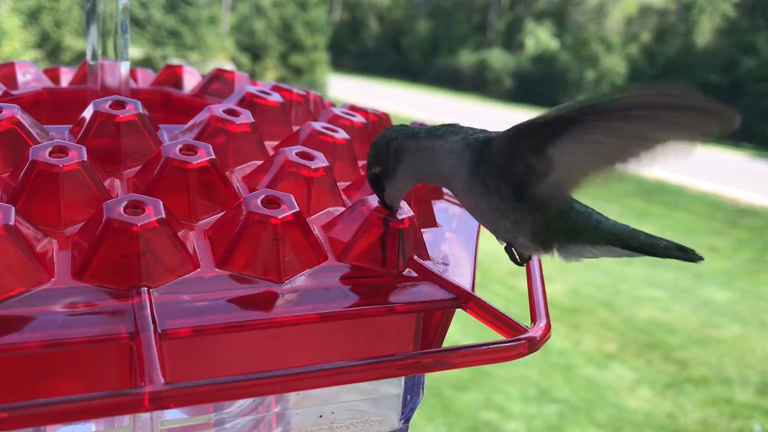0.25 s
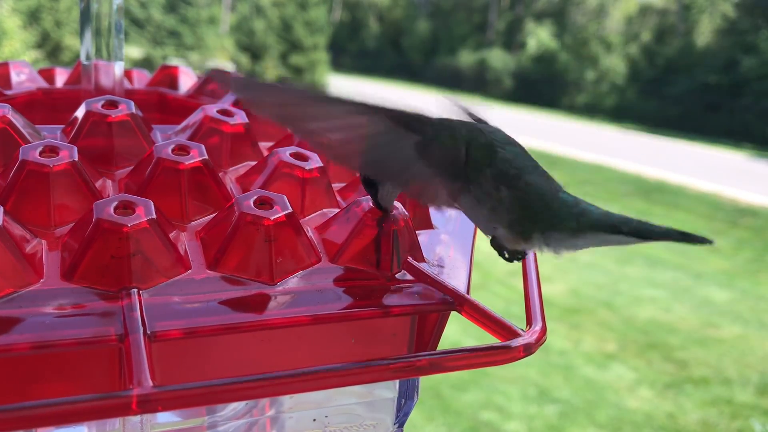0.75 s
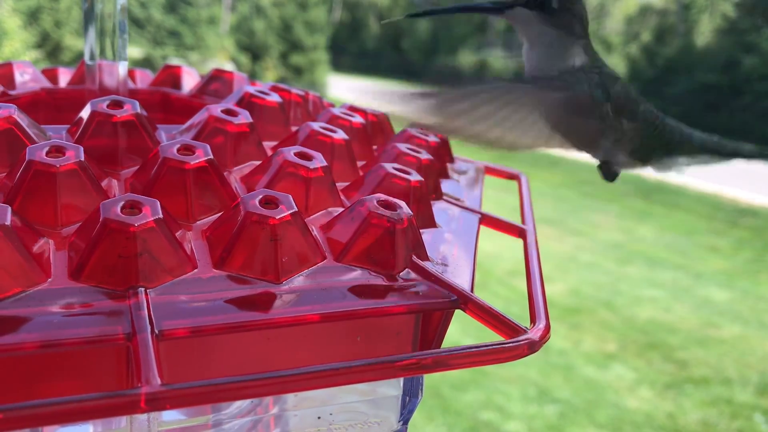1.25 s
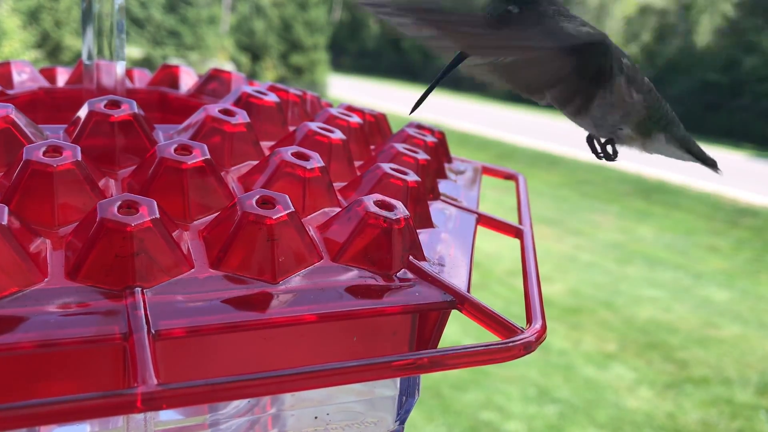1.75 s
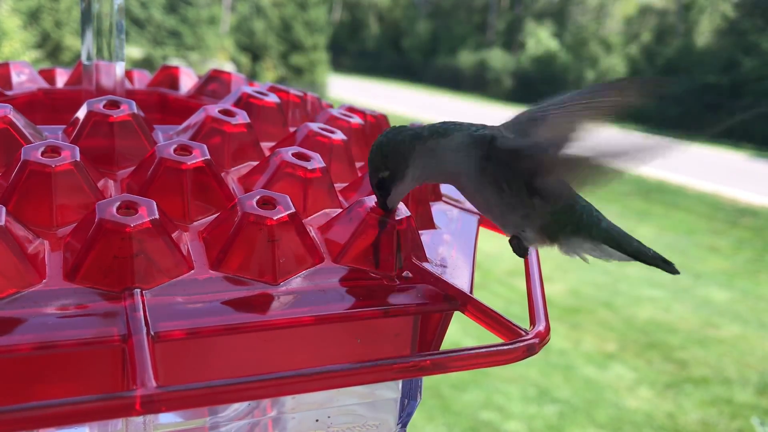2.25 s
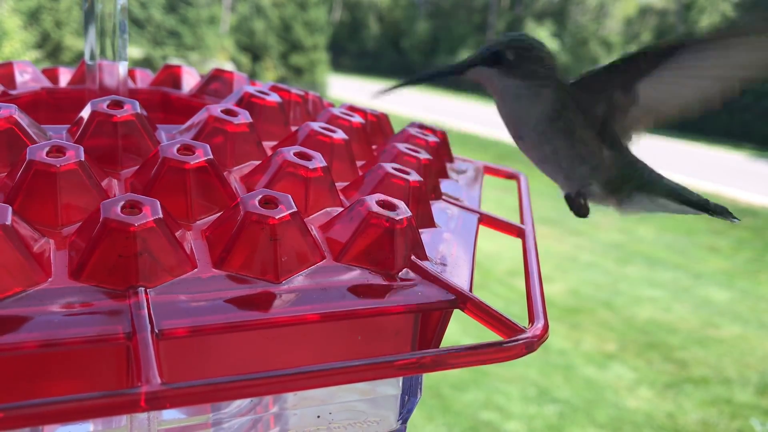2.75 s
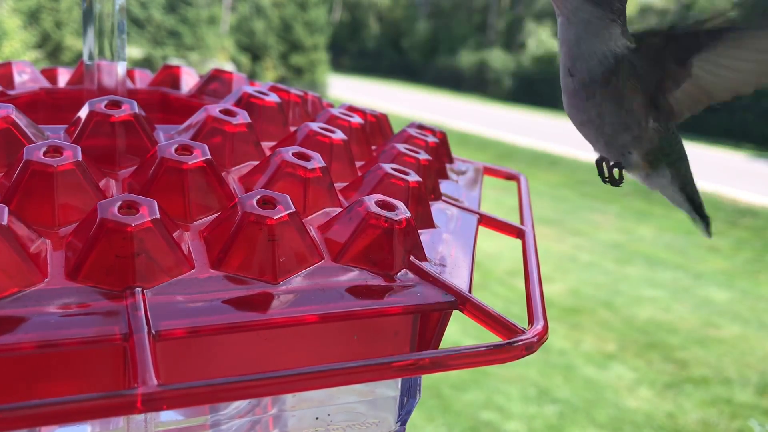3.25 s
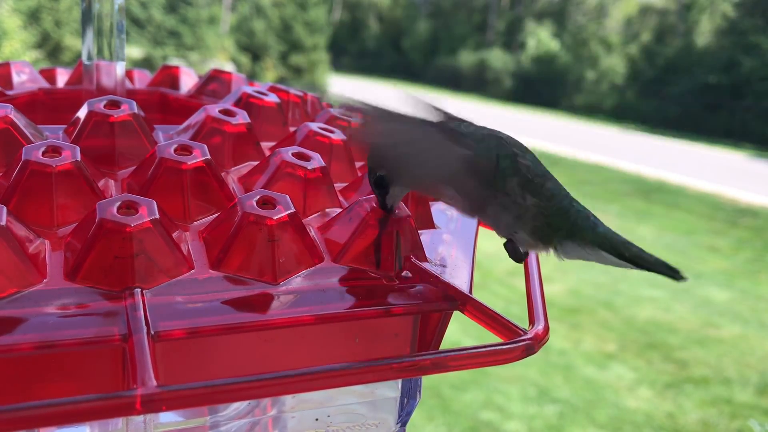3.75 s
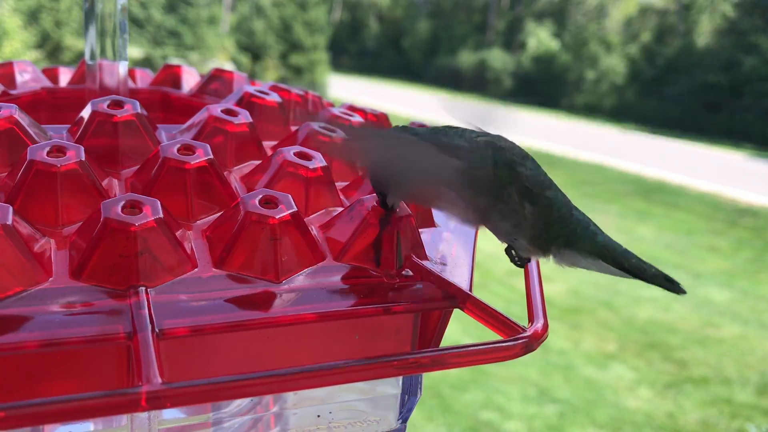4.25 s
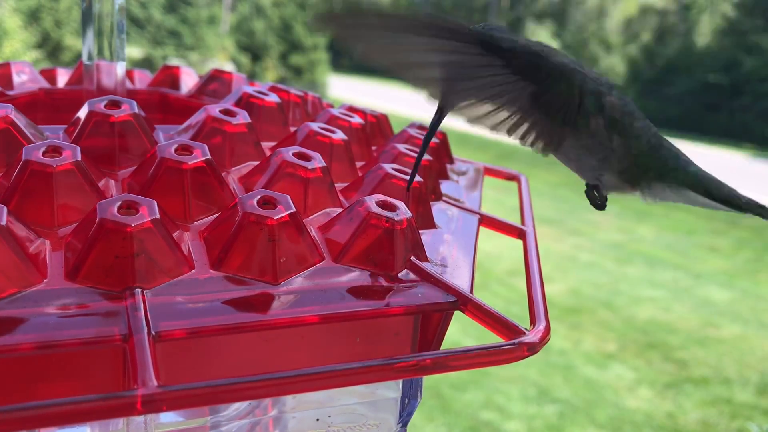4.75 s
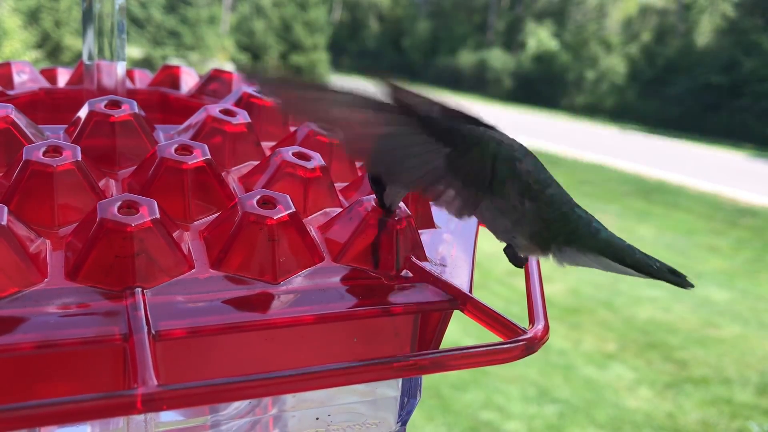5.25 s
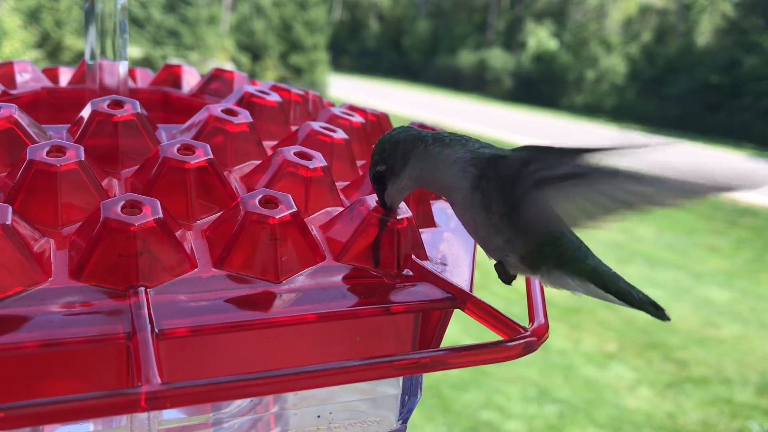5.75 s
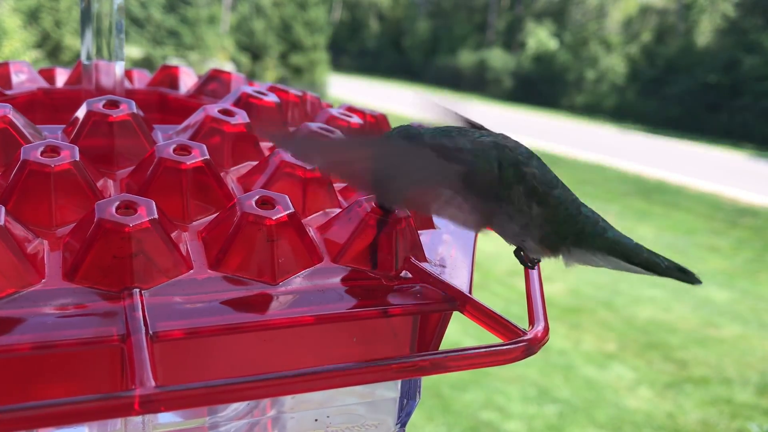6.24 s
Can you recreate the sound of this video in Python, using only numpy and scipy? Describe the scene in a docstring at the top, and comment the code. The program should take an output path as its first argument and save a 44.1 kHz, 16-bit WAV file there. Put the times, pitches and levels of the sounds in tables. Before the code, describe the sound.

A hummingbird hovers at a garden feeder, a hand's width from the microphone. Its wings make a low, continuous hum with a fine feathery swish and a soft rush of air. Several times it darts away and back, and the hum briefly rises in pitch and loudness with a rough whirr. Its downwash flutters and puffs on the microphone, over a faint outdoor murmur and soft hiss.

```python
"""At a garden feeder, a hand's width from the microphone, a hummingbird hovers, backs off and darts in.
Its wings beat about 45 times a second. The periodic air load on them hums as a harmonic series, the
feathers swish at both turns of each beat, and turbulent air rushes louder as the wings speed up.
Darts add a low whirr and a few feather flicks. The downwash puffs on the microphone, which hisses
softly; the garden murmurs behind."""
import sys
import numpy as np
from scipy.fft import rfft, irfft, next_fast_len
from scipy.io import wavfile
from scipy.ndimage import map_coordinates

SR = 44100
rng = np.random.default_rng(int(sys.argv[2]) if len(sys.argv) > 2 else 0)


def log_audio(samples):
    """Write samples as a 16-bit WAV file to the path given in sys.argv[1]."""
    # one column per channel
    frames = np.atleast_2d(samples).T
    # limit to full scale, then quantise
    limited = np.clip(frames, -1, 1)
    pcm = np.round(limited * 32767).astype(np.int16)
    wavfile.write(sys.argv[1], SR, pcm)


N = 286456

# Drifting wingbeat of easy hovering: time_s, rate_hz
HOVER_RATE = [(0, 46.78), (.65, 43.99), (.96, 46.09), (1.3, 44.35), (2.17, 45.68), (2.86, 45.0),
              (3.06, 43.88), (4.02, 43.76), (4.54, 44.36), (5.44, 44.48), (5.69, 44.96), (6.5, 44.17)]
# Darts back from the feeder: peak_s, extra_rate_hz, thrust_ratio, thrust_width_s, whirr_db
RETREATS = [(1.301, 8.29, 1.15, .023, -49), (2.818, 5.82, 1.2, .024, -49), (4.415, 6.69, .9, .017, -46.5),
            (6.441, 6.96, 1.25, .026, -48.5)]
# Flights in again, ending in braking: peak_s, extra_rate_hz, thrust_ratio, thrust_width_s, whirr_db
RETURNS = [(2.017, 5.63, 1.2, .03, -52), (3.563, 4.35, .75, .03, -54), (4.973, 4.87, .6, .025, -60)]
# A retreating bird pushes off, coasts and catches itself: delay_s, width_s, extra_rate_share
RETREAT_PHASES = [(0, .031, 1), (.088, .056, -.49), (.246, .07, .331)]
# A returning bird glides in and brakes: delay_s, width_s, extra_rate_share
RETURN_PHASES = [(-.15, .09, -.553), (0, .075, 1)]

# Base level of the second harmonic as the bird shifts its place: time_s, level_db
SECOND_HARMONIC_LEVEL = [(0, -38.5), (.36, -40), (.48, -44.5), (.62, -38.5), (.78, -45.5), (.92, -38),
                         (1.14, -39.5), (1.21, -43), (1.9, -45.5), (2.2, -41.5), (2.7, -41), (3.85, -40.8),
                         (4.25, -42.3), (5.8, -37), (5.95, -39), (6.25, -37), (6.34, -41.5), (6.45, -40)]
# Base level of the third harmonic, which the fourth partly follows: time_s, level_db
THIRD_HARMONIC_LEVEL = [(0, -42.5), (.25, -45), (.5, -54), (.85, -41.5), (1.25, -49.5), (1.75, -53),
                        (2.1, -46.5), (2.4, -62), (3.15, -51), (3.7, -56), (3.88, -49.5), (4.2, -55.5),
                        (4.65, -51), (5.1, -54.5), (5.72, -51), (5.75, -51), (6.3, -53), (6.47, -50)]
# Base level of the harmonics from the fifth up: time_s, level_db
HIGH_HARMONIC_LEVEL = [(0, -59.5), (.35, -53), (.63, -59.5), (1.1, -52.5), (1.42, -56), (1.72, -52.5),
                       (2.0, -56.5), (2.55, -58.5), (3.1, -58), (3.35, -57.5), (3.8, -55), (4.4, -56.5),
                       (4.66, -53.5), (4.97, -56.5), (5.15, -54.5), (6.0, -57), (6.35, -58), (6.49, -56)]
# High harmonics with the body upright: harmonic_number, gain_db
UPRIGHT_HARMONICS = [(5, -2.5), (6, -7), (7, -9.5), (8, -9), (9, -16.5), (10, -17)]
# High harmonics with the body leaning in: harmonic_number, gain_db
LEANING_HARMONICS = [(5, -6.5), (6, -5), (7, -4), (8, -15.5), (9, -32), (10, -18.5), (11, -23), (12, -22.5),
                     (13, -19)]

# Feather swishes within one beat: phase_beats, width_beats, gain_db, scatter_db
SWISHES = [(0.99, 0.02, 4, 2), (0.89, 0.045, -6, -0.5), (0.43, 0.038, -4.5, 3.5), (0.59, 0.053, -8.5, 0.5)]
# Spectrum of sliding feathers: frequency_hz, gain_db
SWISH_SPECTRUM = [(1500, -27), (3000, -10.5), (4700, -13.5), (6100, -2), (6900, -3), (7650, -7.5),
                  (8600, -1), (9500, -2.5), (10350, -9), (11300, -2.5), (12600, 0), (15500, 1)]
# Rushing air in easy flight: time_s, level_db
RUSH_LEVEL = [(0, -59), (.75, -60), (1.05, -58), (1.5, -60), (2.3, -59.5), (2.9, -61.2), (3.15, -60),
              (4.15, -60), (4.3, -62.5), (5.3, -60.5), (5.68, -62.5), (5.8, -59), (6.49, -60)]
# Spectrum of the rushing air: frequency_hz, gain_db
RUSH_SPECTRUM = [(150, 1), (300, 5.5), (550, 3.5), (700, -1.5), (1100, 1), (1800, -2), (2350, -12),
                 (3200, -10), (4800, -15.5), (9000, -21)]
# Downwash reaching the microphone: time_s, level_db
DOWNWASH_LEVEL = [(0, -45), (.4, -49.5), (.87, -44.5), (1.15, -50), (1.32, -46.5), (1.5, -48), (2.13, -45),
                  (2.66, -47.5), (3.2, -47), (3.55, -47), (4.35, -54), (4.65, -50), (5.2, -56), (5.7, -51),
                  (5.77, -48.5), (6.25, -51.5), (6.49, -46)]
# Spectrum of its eddies: frequency_hz, gain_db
DOWNWASH_SPECTRUM = [(20, -50), (32, -1), (45, 0), (60, 6.5), (110, 1), (150, 2.5), (190, -8.5), (250, -10),
                     (320, -8), (400, -15), (800, -43)]
# Single eddies striking the microphone: centre_s, peak_db, width_s
PUFFS = [(1.855, -31, 0.002), (2.1297, -24.5, 0.0022), (2.367, -32, 0.0039), (3.32, -32.5, 0.001),
         (3.417, -34, 0.0011)]
# Spectrum of the garden's murmur: frequency_hz, gain_db
GARDEN_SPECTRUM = [(25, -42), (60, -18), (100, -2.5), (200, 1), (400, -11), (700, -14.5), (1500, -27.5),
                   (2500, -28), (8000, -33)]
# Spectrum of the microphone's self-noise: frequency_hz, gain_db
HISS_SPECTRUM = [(500, -10.0), (2500, 0.5), (5000, -4.5), (6800, 0.5), (7800, -4.5), (10300, -36.0),
                 (12000, -26.0), (15500, 3.0)]
# Spectrum of separated flow in a dart: frequency_hz, gain_db
WHIRR_SPECTRUM = [(90, -24), (170, -12), (260, 11), (420, -5.5), (600, -6), (800, -22), (2000, -24.5),
                  (4000, -28)]
# Feathers snapping as the bird darts: centre_s, gain_db, pitch_hz
FLICKS = [(1.923, -50, 3180), (2.047, -45.5, 3200), (2.086, -47, 3370)]

TIME_S = np.arange(N) / SR


def amp(db):
    """Amplitude ratio: tenfold for every 20 decibels."""
    return 10 ** (np.asarray(db) / 20)


def unit_rms(x):
    """Normalisation to a root mean square of 1."""
    return x / np.sqrt(np.mean(x ** 2) + 1e-20)


def curve(rows):
    """Linear interpolation of (time_s, value) points, one value a sample."""
    return np.interp(TIME_S, *np.transpose(rows))


def wobble(rate_hz):
    """Smooth random modulation: a spline through rate_hz random knots a second."""
    knots = rng.standard_normal(int(N * rate_hz / SR) + 4)
    return map_coordinates(knots, [TIME_S * rate_hz])


def bump(centre_s, width_s):
    """Gaussian envelope of height 1 and standard deviation width_s."""
    return np.exp(-.5 * ((TIME_S - centre_s) / width_s) ** 2)


def filtered(x, response):
    """Linear filtering: the spectrum of x is multiplied by a frequency response."""
    size = next_fast_len(N + 8192)
    return irfft(rfft(x, size) * response(np.fft.rfftfreq(size, 1 / SR)), size)[:N]


def noise(spectrum):
    """Spectral shaping: white noise filtered through (frequency_hz, gain_db) points, at rms 1."""
    points_hz, gain_db = np.transpose(spectrum)
    response = lambda hz: amp(np.interp(np.log(hz + 1), np.log(points_hz), gain_db))
    return unit_rms(filtered(rng.standard_normal(N), response))


def manoeuvres():
    """Frequency modulation: the effort, in Hz, that darts add to the hovering rate or take from it."""
    return sum(extra_hz * share * bump(peak_s + delay_s, width_s)
               for darts, phases in [(RETREATS, RETREAT_PHASES), (RETURNS, RETURN_PHASES)]
               for peak_s, extra_hz, *_ in darts
               for delay_s, width_s, share in phases)


def hard_strokes():
    """Lag of force behind rate: thrust and whirr peak just after the fastest strokes of a dart."""
    thrust, whirr_gain = np.zeros(N), np.zeros(N)
    for darts, lag_s in [(RETREATS, 0.012), (RETURNS, 0.046)]:
        for peak_s, _, thrust_ratio, width_s, whirr_db in darts:
            swell = bump(peak_s + lag_s, width_s)
            thrust += thrust_ratio * swell
            whirr_gain += amp(whirr_db) * swell
    return thrust, whirr_gain


def posture():
    """Source orientation, 0 leaning in to drink and 1 upright: a longer trip away tilts it further."""
    rise_after_s, lean_before_s, tilt_s = 0.076, 0.11, 0.074
    short_trip_s, full_trip_s = 0.52, 0.75
    upright = np.zeros(N)
    for (away_s, *_), (back_s, *_) in zip(RETREATS, RETURNS):
        height = (back_s - away_s - short_trip_s) / (full_trip_s - short_trip_s)
        inside_s = np.minimum(TIME_S - away_s - rise_after_s, back_s - lean_before_s - TIME_S)
        upright += height * np.clip(.5 + inside_s / tilt_s, 0, 1)
    return np.clip(0.08 + upright, 0, 1)


def lull_db():
    """Attenuation of the second harmonic for one stretch; it sets in and lifts within a beat."""
    start_s, end_s, edge_s = 4.236, 5.736, .012
    return np.interp(TIME_S, [start_s, start_s + edge_s, end_s - edge_s, end_s], [0, -5.5, -11, 0])


def harmonics(beats, rows, lead_beats, waver_rad, waver_db):
    """Fourier series of the air load; phases and levels waver, as no two strokes are alike."""
    total = np.zeros(N)
    for number, gain_db in rows:
        phase = 2 * np.pi * number * (beats + lead_beats) + waver_rad * wobble(24)
        total -= np.sqrt(2) * amp(gain_db + waver_db * wobble(18)) * np.sin(phase)
    return total


def wing_hum(beats, effort_hz, thrust):
    """Loading noise: both strokes lift, favouring harmonic 2; upright, unequal strokes raise harmonic 1."""
    upright = posture()
    first_db = -52 + 3 * (curve(DOWNWASH_LEVEL) + 47) + 7 * upright + 1.1 * effort_hz
    second_db = curve(SECOND_HARMONIC_LEVEL) + lull_db() - 6 * upright + 0.38 * effort_hz + 5.8 * thrust
    third_db = curve(THIRD_HARMONIC_LEVEL) + 0.53 * effort_hz + 3.3 * thrust
    fourth_db = third_db.mean() - 3.5 + 0.72 * (third_db - third_db.mean())
    high_db = curve(HIGH_HARMONIC_LEVEL) + 4 * upright + 4.5 * thrust
    first = amp(first_db) * harmonics(beats, [(1, 0)], lead_beats=0.12, waver_rad=0.61, waver_db=-2.0)
    second = amp(second_db) * harmonics(beats, [(2, 0.051)], 0.087, waver_rad=0.14, waver_db=-0.8)
    third = amp(third_db) * harmonics(beats, [(3, 0)], 0.084, waver_rad=0.35, waver_db=2.3)
    fourth = amp(fourth_db) * harmonics(beats, [(4, 0)], 0.094, waver_rad=0.22, waver_db=2.9)
    # Directivity: the body's tilt decides which stroke throws its sharper pulse at the microphone.
    upright_pulse = harmonics(beats, UPRIGHT_HARMONICS, 0.046, waver_rad=0.6, waver_db=2.0)
    leaning_pulse = harmonics(beats, LEANING_HARMONICS, 0.401, waver_rad=0.38, waver_db=1.5)
    high = amp(high_db) * (np.sqrt(upright) * upright_pulse + np.sqrt(1 - upright) * leaning_pulse)
    return first + second + third + fourth + high


def feather_swish(beats, effort_hz, thrust):
    """Friction noise: feathers slide as the wing flips, sharply at one turn and softly at the other."""
    power = np.zeros(N)
    for phase_beats, width_beats, gain_db, scatter_db in SWISHES:
        nearest_beat = np.round(beats - phase_beats).astype(int)
        beat_gains = amp(gain_db + scatter_db * rng.standard_normal(400))
        window = np.exp(-.5 * ((beats - phase_beats - nearest_beat) / width_beats) ** 2)
        power += beat_gains[nearest_beat + 2] ** 2 * window  # incoherent sounds add in power
    level_db = -56.1 + 0.31 * effort_hz + .9 * thrust + .5 * wobble(8)
    return amp(level_db) * unit_rms(np.sqrt(power) * noise(SWISH_SPECTRUM))


def air_rush(beats, effort_hz, thrust):
    """Turbulence noise: air tears off the wings once a stroke, loudest when the bird darts."""
    level_db = curve(RUSH_LEVEL) + 0.27 * effort_hz + 3.7 * thrust
    stroke_db = 1.9 * np.cos(4 * np.pi * (beats - .06)) + np.cos(2 * np.pi * (beats - .52))
    return amp(level_db) * unit_rms(amp(stroke_db) * noise(RUSH_SPECTRUM))


def downwash():
    """Convected pressure: eddies from the wings flutter on the microphone; a few strike as puffs."""
    pressure = amp(curve(DOWNWASH_LEVEL)) * noise(DOWNWASH_SPECTRUM)
    for centre_s, peak_db, width_s in PUFFS:
        passage = (TIME_S - centre_s) / width_s
        pressure += amp(peak_db) * passage * np.exp((1 - passage ** 2) / 2)  # suction, then a push
    return pressure


def garden_murmur():
    """Ambient noise: a faint, steady outdoor background, strongest in the bass."""
    return amp(-58) * noise(GARDEN_SPECTRUM)


def microphone_hiss():
    """Self-noise: the microphone adds a soft, steady hiss."""
    return amp(-64.5) * noise(HISS_SPECTRUM)


def dart_whirr(beats, gain):
    """Flow separation: in a dart the air breaks from the wings in rough, low bursts, one to a beat."""
    bursts = amp(5.2 * np.cos(2 * np.pi * (beats + 0.034)))
    return gain * unit_rms(bursts * noise(WHIRR_SPECTRUM))


def feather_flicks():
    """Impulsive excitation: a feather snaps past its neighbour in a millisecond of narrow-band noise."""
    total = np.zeros(N)
    for centre_s, gain_db, pitch_hz in FLICKS:
        band = noise([(pitch_hz / 2, -25), (pitch_hz, 0), (pitch_hz * 2, -25), (pitch_hz * 4, -60)])
        total += amp(gain_db - 6.5) * bump(centre_s, width_s=0.00065) * band
    return total


def scene():
    """Superposition: wing sounds locked to one beat count add to the downwash and the background."""
    effort_hz = manoeuvres()
    thrust, whirr_gain = hard_strokes()
    start_beats = .203
    jitter_beats = .014 * wobble(rate_hz=12)
    beats = start_beats + np.cumsum(curve(HOVER_RATE) + effort_hz) / SR + jitter_beats
    hovering = sum(source(beats, effort_hz, thrust) for source in (wing_hum, feather_swish, air_rush))
    darting = dart_whirr(beats, whirr_gain) + feather_flicks()
    return (hovering + darting + downwash() + garden_murmur() + microphone_hiss())[None]


def record(dry):
    """Band limiting: a sixth-order high-pass thins the deepest bass; a sharp cutoff ends the treble."""
    low_hz, top_hz = 33., 15850
    response = lambda hz: hz ** 6 / np.sqrt(hz ** 12 + low_hz ** 12) * (hz < top_hz)
    return filtered(dry[0], response)[None]


dry = scene()
out = record(dry)
log_audio(out)
```